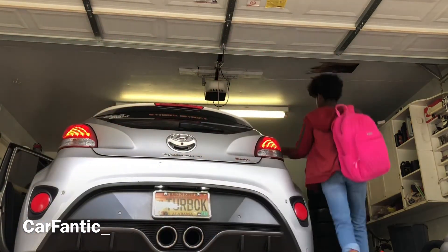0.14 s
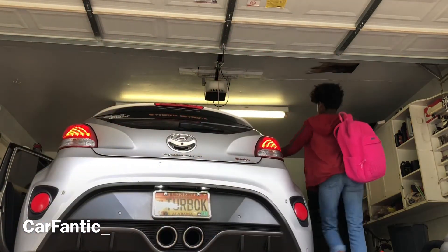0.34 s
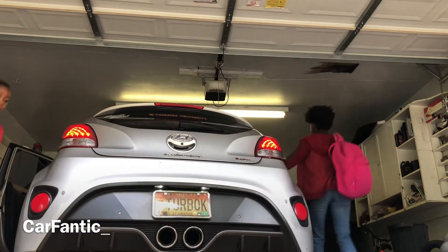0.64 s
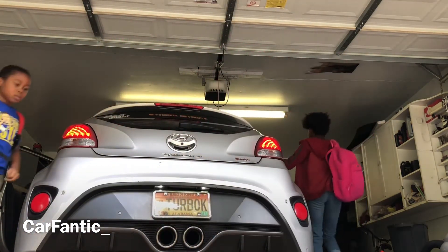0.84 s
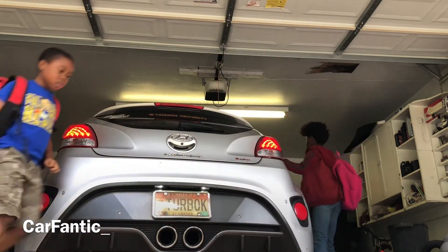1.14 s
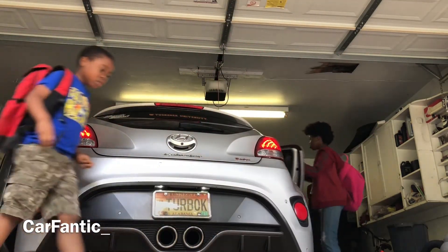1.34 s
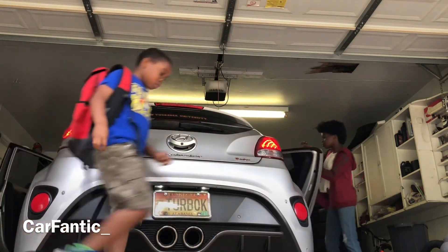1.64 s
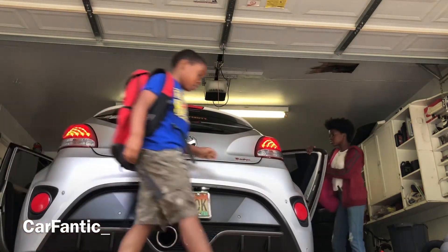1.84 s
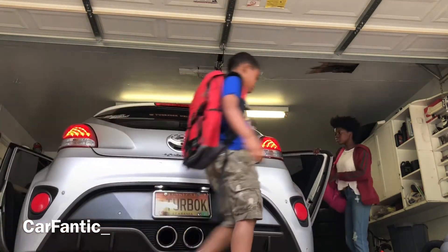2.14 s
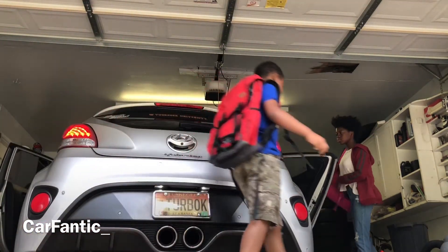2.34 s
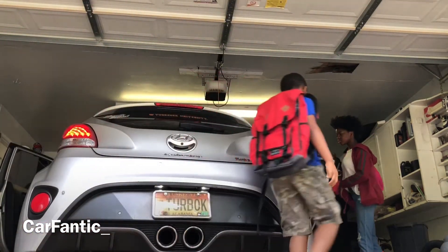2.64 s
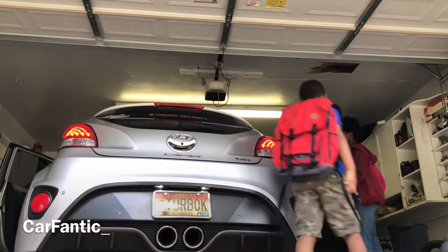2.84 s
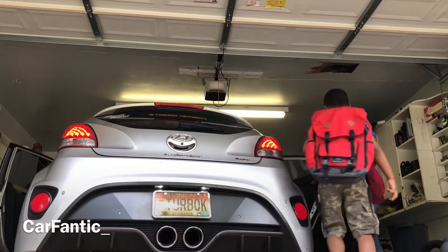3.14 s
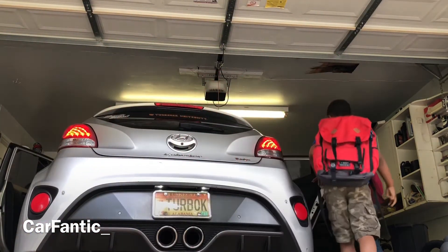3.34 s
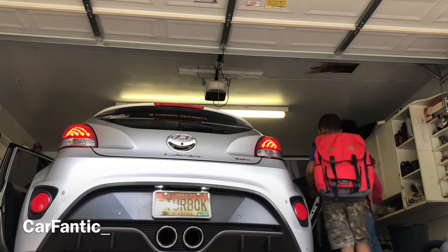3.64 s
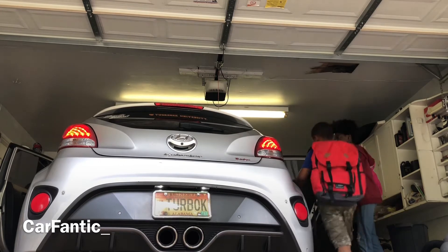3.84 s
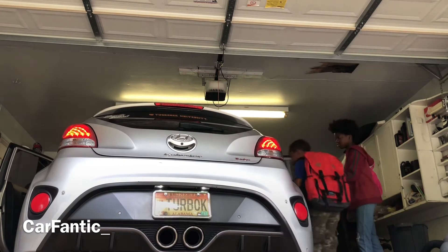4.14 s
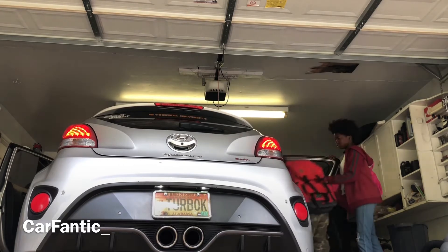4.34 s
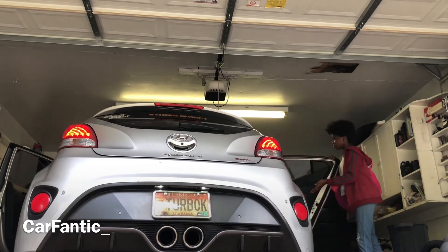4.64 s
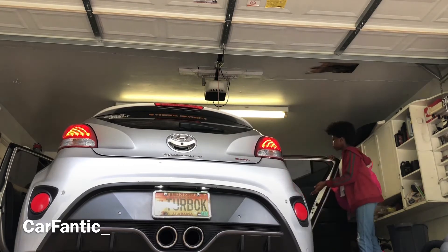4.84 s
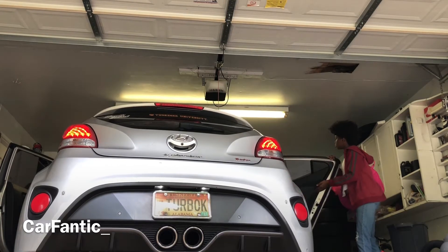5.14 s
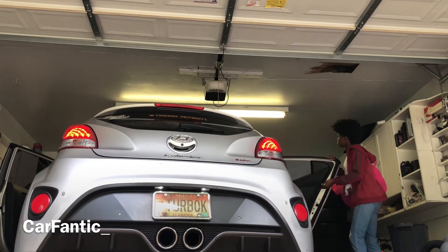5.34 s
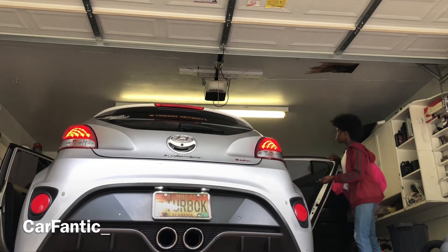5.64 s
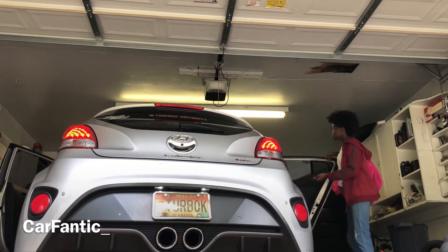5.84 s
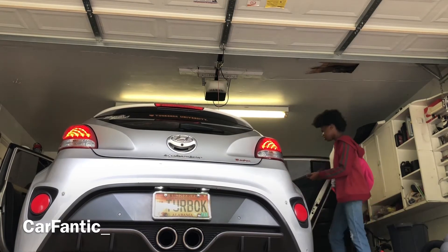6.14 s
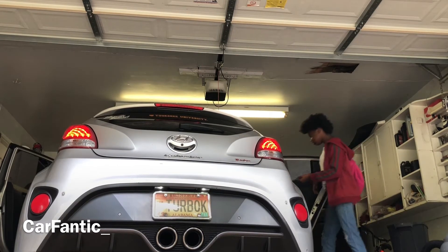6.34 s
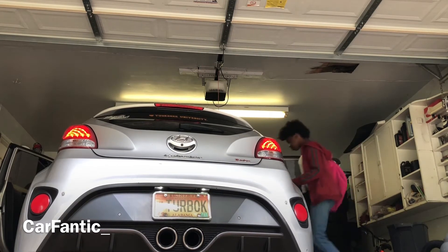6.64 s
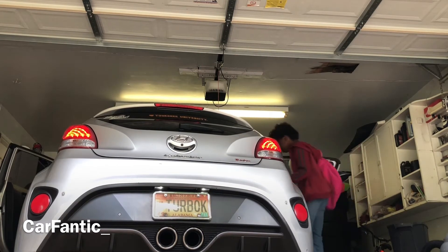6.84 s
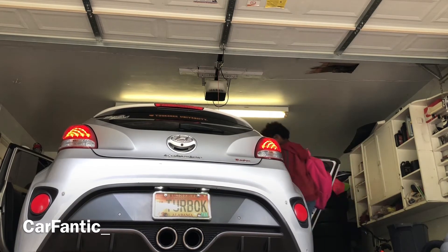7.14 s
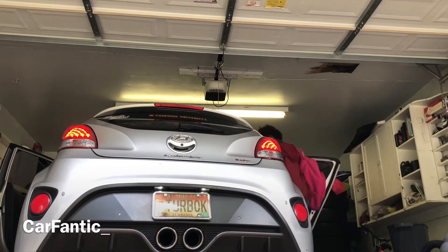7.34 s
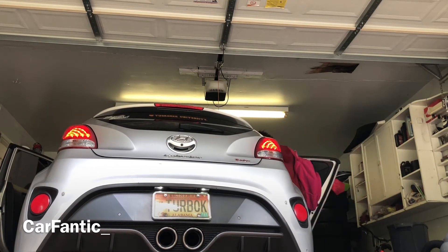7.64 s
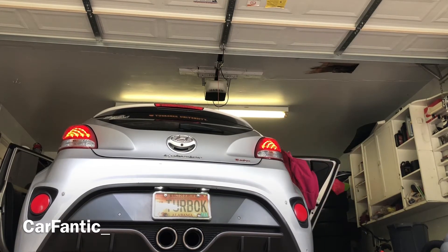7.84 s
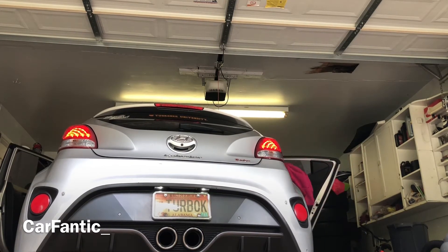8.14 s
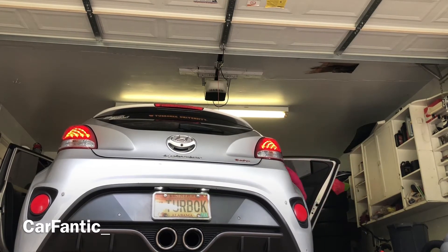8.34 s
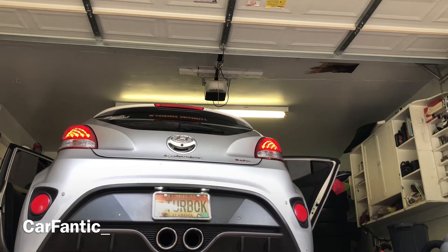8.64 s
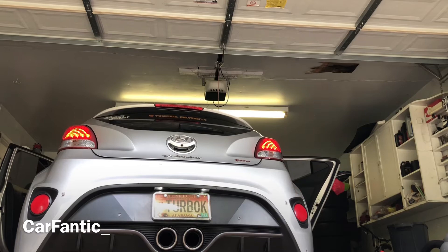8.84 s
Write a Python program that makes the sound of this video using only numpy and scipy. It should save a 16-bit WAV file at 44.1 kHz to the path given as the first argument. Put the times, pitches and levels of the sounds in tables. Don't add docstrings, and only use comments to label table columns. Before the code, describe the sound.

A four-cylinder car with a loud open exhaust idles quickly and steadily in a hard garage, heard from a phone on the floor behind the tailpipes. A deep droning boom near 100 hertz carries hollow barks, metallic rasp and pulsing gas hiss. A few very faint shoe scrapes tick in the first second and once again near 2.4 seconds. No revving; only a tiny stumble near five seconds.

```python
import sys
import numpy as np
from scipy import signal
from scipy.fft import rfft, irfft, next_fast_len
from scipy.io import wavfile
from scipy.ndimage import uniform_filter1d

SR = 44100
rng = np.random.default_rng(int(sys.argv[2]) if len(sys.argv) > 2 else 0)


def store_pcm(level_fs):
    pcm = np.round(np.clip(level_fs, -1, 1) * 32767).astype(np.int16)
    wavfile.write(sys.argv[1], SR, np.atleast_2d(pcm).T)


def decibels_to_gain(level_db):
    exponent = np.asarray(level_db, float) / 20
    return 10 ** exponent


N = 396900

# (time [s], firing rate [Hz])
IDLE_SPEED = [(0.0, 50.014), (1.51, 49.972), (1.59, 49.878), (2.67, 49.71), (2.77, 49.789), (4.4, 49.533),
              (4.88, 48.99), (4.96, 49.456), (5.66, 49.469), (5.75, 49.119), (5.97, 49.785), (6.07, 49.639),
              (7.6, 49.827), (7.68, 50.1), (7.91, 49.463), (8.04, 49.788), (8.64, 49.921), (9.0, 49.505)]
# (multiple of firing rate [ratio], level [dB], slope [dB per Hz of rate])
PIPE_MULTIPLES = [(0.5, -50.3, -1.3), (1.0, -38.7, 1.1), (1.5, -21.5, 1.4), (2.0, 0.0, -1.5),
                  (2.5, -18.3, 1.1), (3.0, -9.7, 0.1), (3.5, -19.0, 0.6), (4.0, -7.7, 0.7),
                  (4.5, -26.7, -0.4), (5.0, -19.5, -5.8), (5.5, -24.6, 7.8), (6.0, -17.2, 2.4),
                  (6.5, -26.2, 12.3), (7.0, -8.9, -1.7), (7.5, -10.9, 5.2), (8.0, -15.1, 0.6),
                  (8.5, -20.2, 7.1), (9.0, -16.8, 1.0), (9.5, -21.9, -5.6), (10.0, -13.1, -3.6),
                  (10.5, -29.2, -1.1), (11.0, -21.8, 1.9), (11.5, -26.2, 8.2), (12.0, -14.7, 9.3),
                  (12.5, -21.3, 5.6), (13.0, -21.0, -1.1), (13.5, -22.0, -2.7), (14.0, -13.3, 0.5),
                  (14.5, -25.6, -0.6), (15.0, -26.1, 10.6), (15.5, -18.9, -4.4), (16.0, -33.0, 12.9),
                  (16.5, -17.6, 8.4), (17.0, -29.0, 2.9), (17.5, -17.7, 8.3), (18.0, -27.9, -1.8)]
SHARED_PATHS = [(-.376, -.444), (-.183, -.384), (.045, -.472)]
BRANCH_PATHS = [(-.437, -.74), (-.353, -.364), (.122, -.508)]
# (centre [Hz], width [Hz], level [dB])
SAG_MODE = (442, 2.2, 8.3)
CYLINDER_LATE_S = [1.5e-5, 0, -1.5e-5, 0]
CYLINDER_DB = [-1.7, -2, 5, 2.3]
# (centre [Hz], width [Hz], level [dB])
TIP_MODES = [(1020, 150, -17), (1115, 60, 2), (1258, 75, -9), (1426, 139, 0), (1570, 19, -7),
             (1670, 33, -11.5), (1854, 77, -13), (1937, 90, -9.5), (2137, 23, -12.5), (2195, 14, -8.5),
             (2230, 52, -16.5), (2434, 54, -14.5), (2583, 14, -17.5), (2700, 35, -13.5), (2755, 77, -30),
             (2924, 74, -19.5), (3240, 53, -25.5), (3572, 130, -21), (3960, 200, -24), (4280, 32, -25.5),
             (4790, 42, -26)]
# (frequency [Hz], level [dB per Hz])
GAS_COLOUR = [(25, -54), (60, -39), (150, -8), (280, -13.5), (400, -2.5), (700, -6.5), (900, -4.5),
              (1200, -15), (3000, -27), (5200, -29.5), (6000, -31), (7000, -37.5), (10000, -43),
              (15500, -47)]
# (centre [Hz], width [Hz], level [dB])
BELT_BANDS = [(8300, 470, -58), (11150, 150, -68), (11500, 150, -69), (14200, 200, -65)]
# (time [s], level [dB], length [s], centre [Hz])
SCUFFS = [
    (.14, -57, .012, 9000),
    (.29, -53.5, .02, 13000),
    (.582, -47, .011, 10000),
    (.985, -50, .022, 11000),
    (2.41, -48.5, .022, 12000),
]

MEAN_HZ = 49.733
TONE_DB, RING_DB, GAS_DB = -10, -25.5, -23.5
HUNT_PERIODS, HUNT_PER_S = .004, 8
GAS_LAG, HISS_LATE = -.62, .07
WARM_DB_PER_S, PASSER_DB, STUMBLE_DB = (-0.1, -0.07, 0.05), (-0.5, 2.5, 1.5), (-0.1, 1, -1.5)
PASSER_S, PASSER_WIDTH_S, STUMBLE_S, STUMBLE_WIDTH_S = 2.25, .3, 4.8, .12
BELT_WARM_DB_PER_S = 0.15
BOOM_LAG_PER_HZ = .033
ECHO_NOTCH, ECHO_SPACING, ECHO_TURN, ECHO_SLIP = 10.75, 5, .23, .09
PAIR_DB = 1.1
LATE_HZ, LATE_S, DRY_HZ, DRY_ECHO_DB = 1300, .005, 1700, -7


def pipe(fired, hz, bark_db, boom_lag, jitter_s=1.5e-5, wander_db=.07):
    cylinder_late_s = np.interp(fired % 4, np.arange(5), np.resize(CYLINDER_LATE_S, 5))
    fired = fired - MEAN_HZ * (cylinder_late_s + jitter_s * walk(50))
    low_bark_db, high_bark_db = bark_db
    shades_db = 0, low_bark_db, high_bark_db + PAIR_DB * np.cos(np.pi / 2 * fired)
    mode_hz, mode_width_hz, mode_db = SAG_MODE
    out = 0
    for rows, paths in ((PIPE_MULTIPLES[1::2], SHARED_PATHS), (PIPE_MULTIPLES[::2], BRANCH_PATHS)):
        multiples, db, _ = np.transpose(rows)
        causal = response(np.r_[10, multiples * MEAN_HZ, 1000, 1500], np.r_[-70, db, -45, -80])
        for k, db, slope in rows:
            band = int(k > 6.2) + int(k > 9.4)
            turn, lag = paths[band]
            if k > ECHO_NOTCH:
                turn = turn + ECHO_TURN - ECHO_SLIP * ((k - ECHO_NOTCH) % ECHO_SPACING)
            phase = np.angle(causal[round(k * MEAN_HZ * 8192 / SR)]) + 2 * np.pi * (turn - k * lag)
            moving_db = slope * (hz - MEAN_HZ) + wander_db * k * walk(3.9) + shades_db[band]
            if k == 9:
                moving_db = moving_db + mode_db * np.exp(-((k * hz - mode_hz) / mode_width_hz) ** 2)
            periods = fired - (k == 2) * boom_lag
            out = out + decibels_to_gain(db + moving_db) * np.cos(2 * np.pi * k * periods + phase)
    return out


def shading(t):
    def bump(centre_s, width_s):
        return np.exp(-.5 * ((t - centre_s) / width_s) ** 2)

    causes = t - t.mean(), bump(PASSER_S, PASSER_WIDTH_S), bump(STUMBLE_S, STUMBLE_WIDTH_S)
    return np.transpose([WARM_DB_PER_S, PASSER_DB, STUMBLE_DB]) @ causes


def tip(at, since_s, flutter_db=1.1):
    echoed = waves(at, since_s, 0, CYLINDER_DB)
    dry_waves = waves(at, since_s, DRY_ECHO_DB, [0])
    late = np.roll(echoed, int(LATE_S * SR))
    out = 0
    for k, (hz, width_hz, db) in enumerate(TIP_MODES):
        drive = late if hz < LATE_HZ else echoed if hz < DRY_HZ else dry_waves
        narrow = ring(drive, hz, 0.66 * width_hz)
        rung = ring(narrow, hz, max(2.0 * width_hz, 0.068 * hz))
        out = out + (-1) ** k * decibels_to_gain(db + flutter_db * walk(18)) * rung
    return out


def waves(at, since_s, echo_db, cylinder_db, jitter_s=1e-4, scatter_db=2.0, puff_db=2.5):
    drive = 0
    for delay_s, db in ((0, 0), (.0043, echo_db - 4), (.0075, echo_db - 8)):
        late, uneven = rng.standard_normal((len(at), 2)).T
        size = decibels_to_gain(db + scatter_db * uneven + np.resize(cylinder_db, len(at)))
        drive = drive + clicks(at + (delay_s + jitter_s * late) * SR, size)
    turbulence = puff(since_s, .005, -14) * rng.standard_normal(N)
    return level(drive, 0) + level(turbulence, puff_db)


def puff(since_s, open_s, closed_db):
    leak = decibels_to_gain(closed_db)
    return leak + (1 - leak) / (1 + (since_s / open_s) ** 4)


def gas(since_s):
    hz, db = np.transpose(GAS_COLOUR)
    puffs = decibels_to_gain(.5 * walk(60)) * puff(since_s, .009, -4) * rng.standard_normal(N)
    gated = colour(puffs, hz, db)
    steady = colour(rng.standard_normal(N), hz, db - 1)
    low = signal.butter(2, 6500, fs=SR, output="sos")
    return signal.sosfilt(low, gated) + steady - signal.sosfiltfilt(low, steady)


def garage(x, t60_s=.3, wet_db=-9):
    t = np.arange(int(.5 * SR)) / SR
    tail = rng.standard_normal(len(t)) * np.exp(-np.log(1000) * t / t60_s) * (t > .003)
    tail = decibels_to_gain(wet_db) * tail / np.sqrt(np.sum(tail ** 2))
    return x + signal.fftconvolve(x, tail)[:N]


def engine_bay():
    out = 0
    for hz, width_hz, db in BELT_BANDS:
        band = ring(rng.standard_normal(N), hz, width_hz)
        out = out + level(decibels_to_gain(1.2 * walk(6)) * band, db)
    return out


def shoes():
    t = np.arange(N) / SR
    grit = rng.standard_normal(N) * decibels_to_gain(2.5 * walk(300))
    out = 0
    for at_s, db, length_s, hz in SCUFFS:
        scrape = level(ring(ring(grit, hz, 8000), hz, 8000), db)
        out = out + np.exp(-.5 * ((t - at_s) / length_s) ** 2) * scrape
    return out


def level(x, db):
    return x * decibels_to_gain(db) / np.sqrt(np.mean(x ** 2))


def ring(x, hz, width_hz):
    return signal.lfilter(*signal.iirpeak(hz, hz / width_hz, fs=SR), x)


def clicks(at, size):
    at = np.clip(at, 0, N - 2)
    whole = at.astype(int)
    part = at - whole
    return np.bincount(whole, size * (1 - part), N) + np.bincount(whole + 1, size * part, N)


def walk(rate):
    k = int(SR / rate)
    held = np.repeat(rng.standard_normal(N // k + 1), k)
    return 1.43 * uniform_filter1d(uniform_filter1d(held, k), k)[:N]


def response(hz, db):
    f = np.arange(4097) * SR / 8192
    cepstrum = irfft(np.log(decibels_to_gain(np.interp(np.log(f + 1), np.log(hz), db))))
    cepstrum[1:4096] *= 2
    cepstrum[4097:] = 0
    return np.exp(rfft(cepstrum))


def colour(x, hz, db):
    size = next_fast_len(N + SR)
    kernel = irfft(response(hz, db))
    return irfft(rfft(x, size) * rfft(kernel, size), size)[:N]


def scene():
    t = np.arange(N) / SR
    hz = np.interp(t, *np.transpose(IDLE_SPEED))
    boom_db, *bark_db = shading(t)
    boom_lag = BOOM_LAG_PER_HZ * (uniform_filter1d(hz, SR // 5) - MEAN_HZ)
    fired = np.cumsum(hz) / SR + HUNT_PERIODS * walk(HUNT_PER_S) + boom_lag
    at = np.interp(np.arange(1, int(fired[-1]) + 1) + GAS_LAG, fired, np.arange(N))
    since_s = (fired - GAS_LAG) % 1 / hz
    hiss_since_s = (fired - GAS_LAG - HISS_LATE) % 1 / hz
    car = level(pipe(fired, hz, bark_db, boom_lag), TONE_DB)
    car = car + level(garage(tip(at, since_s), wet_db=-8.5), RING_DB)
    car = car + level(garage(gas(hiss_since_s)), GAS_DB)
    belts = decibels_to_gain(BELT_WARM_DB_PER_S * (t - t.mean())) * engine_bay()
    return (car * decibels_to_gain(boom_db) + belts + shoes())[None]


def top_cut(x):
    return signal.sosfilt(signal.butter(12, 15770, fs=SR, output="sos"), x)


def record(dry):
    top = 1.9
    mix = top * np.tanh(dry / top)
    return top_cut(mix)


dry = scene()
out = record(dry)
store_pcm(out)
```